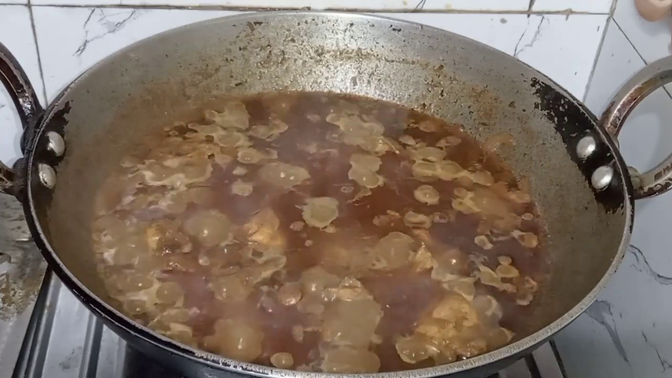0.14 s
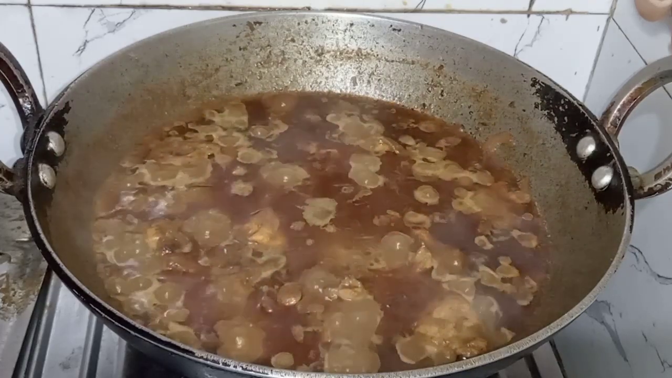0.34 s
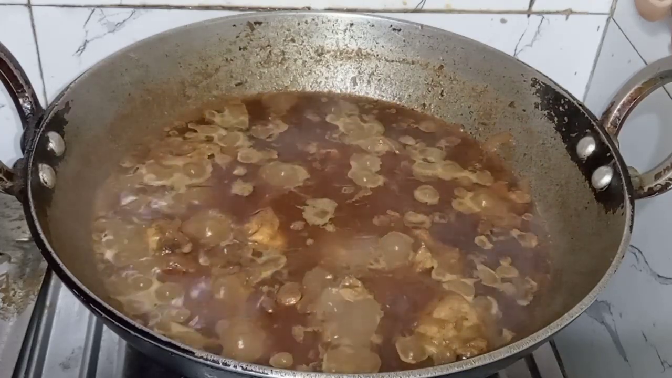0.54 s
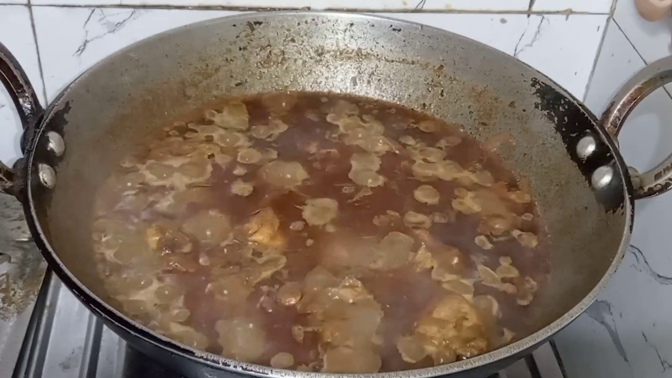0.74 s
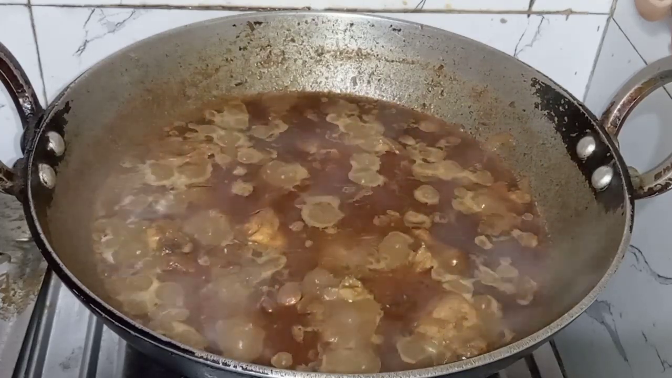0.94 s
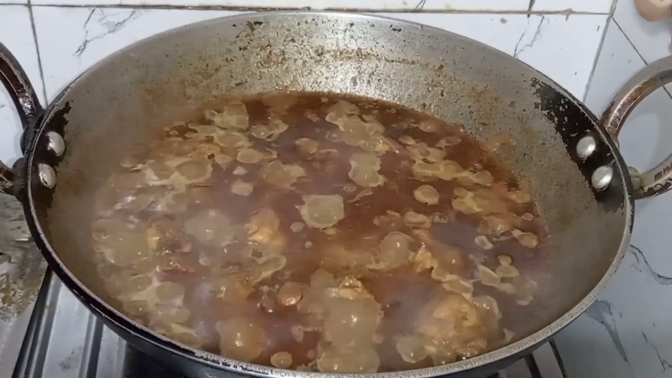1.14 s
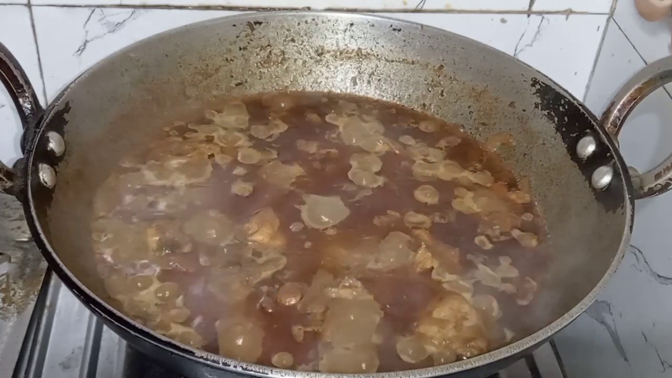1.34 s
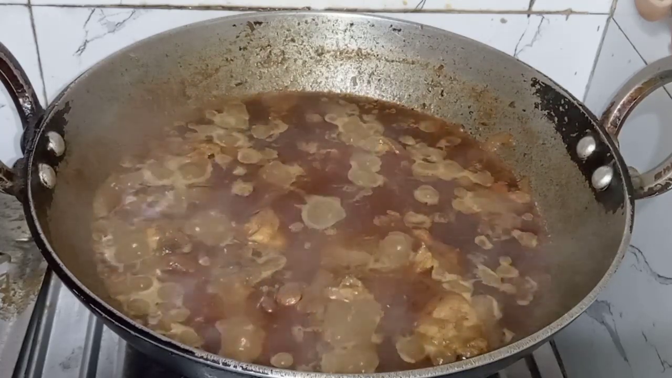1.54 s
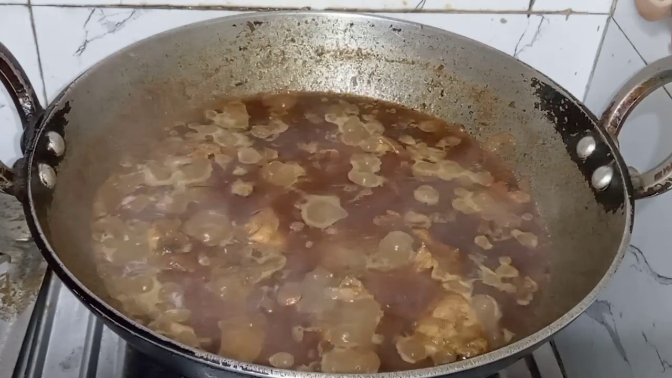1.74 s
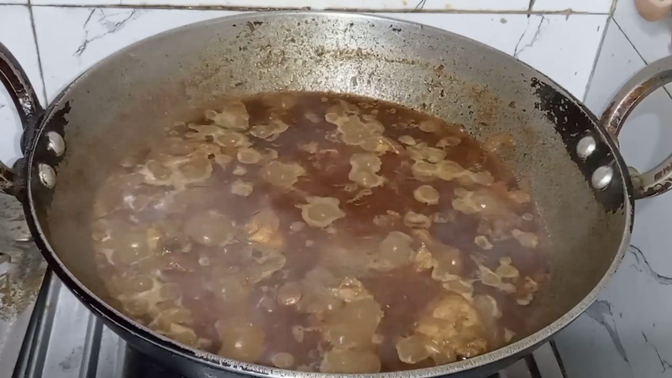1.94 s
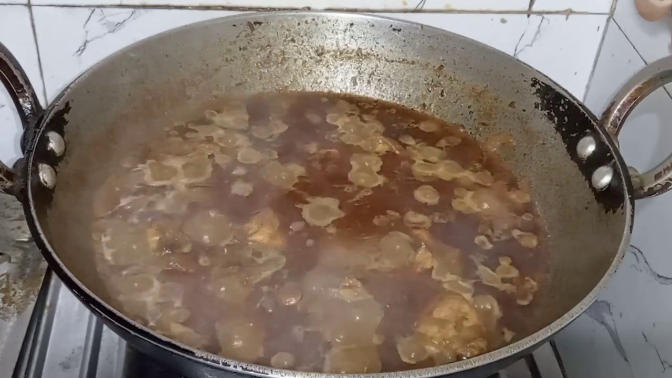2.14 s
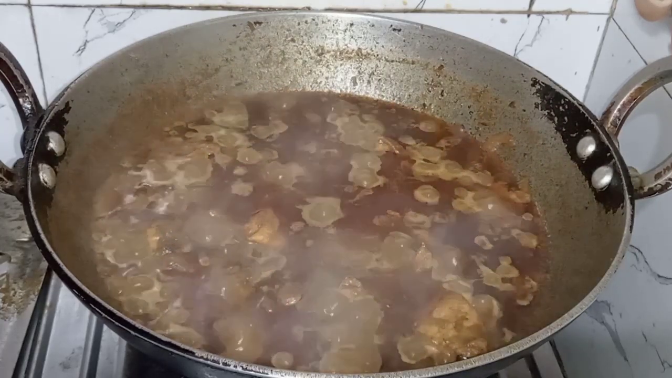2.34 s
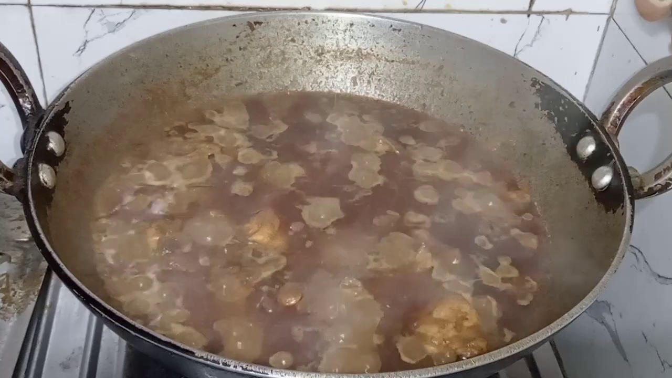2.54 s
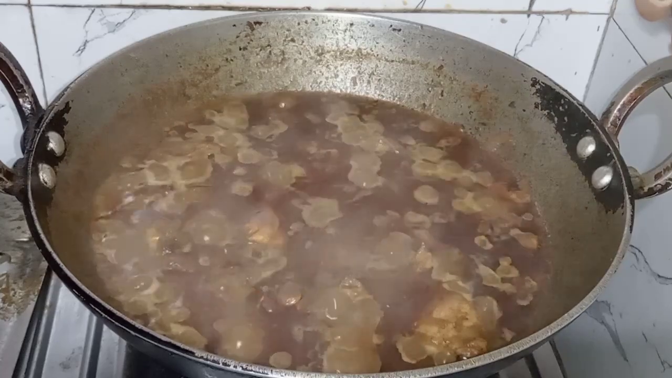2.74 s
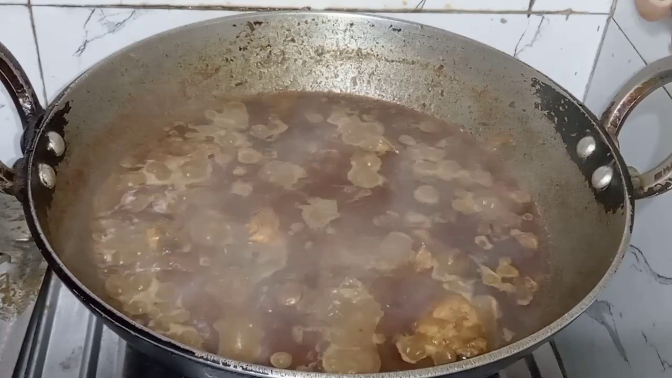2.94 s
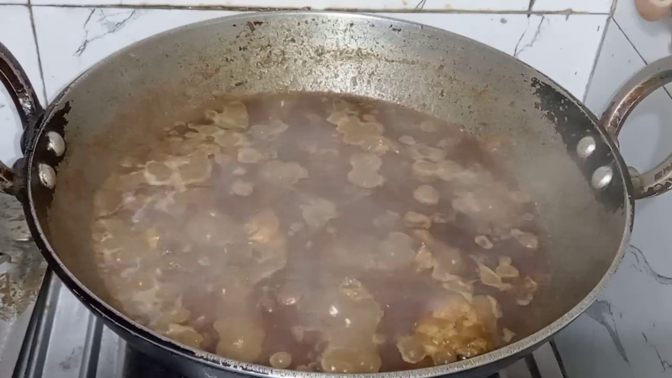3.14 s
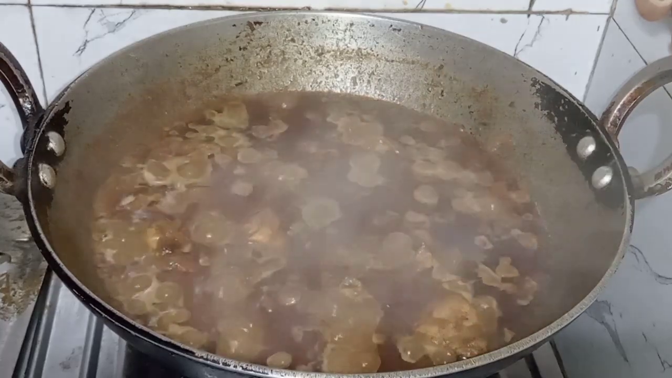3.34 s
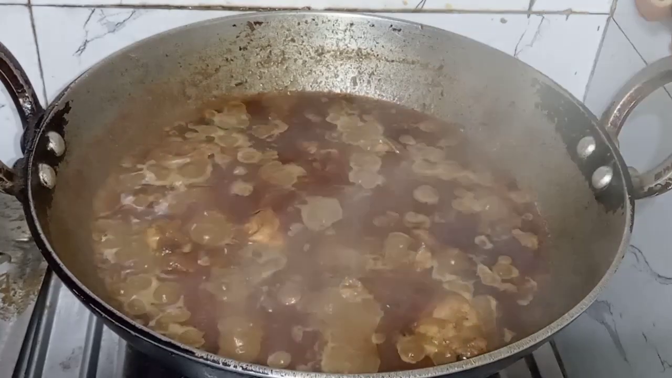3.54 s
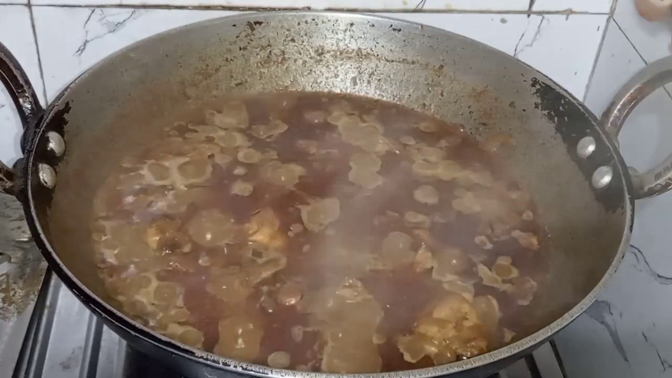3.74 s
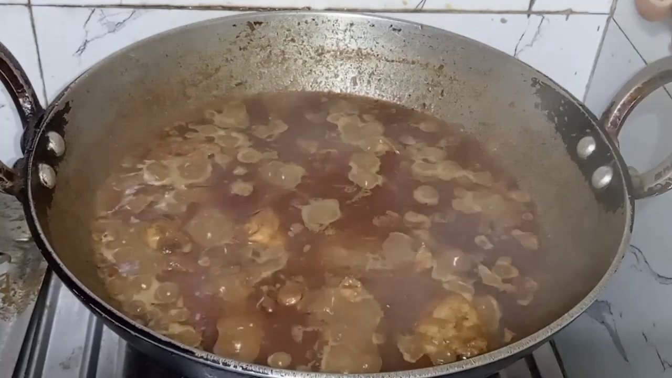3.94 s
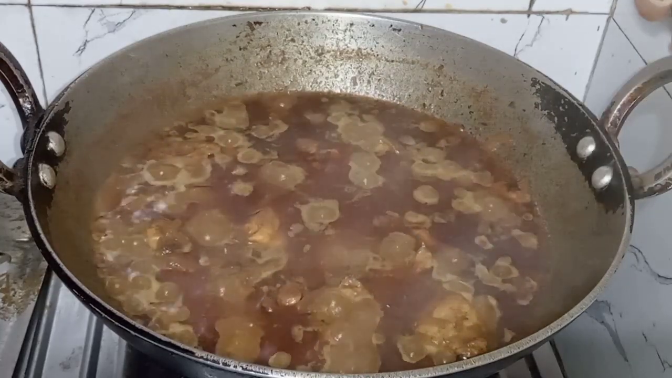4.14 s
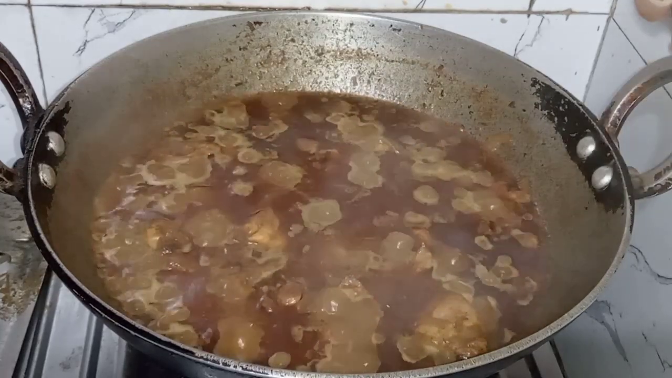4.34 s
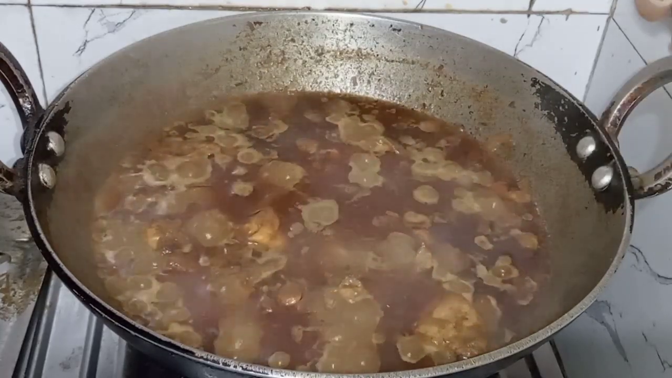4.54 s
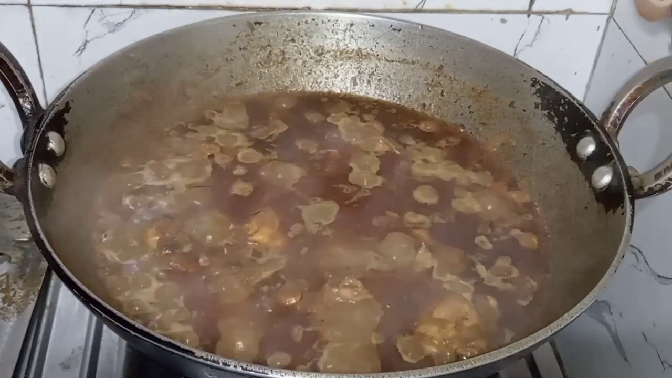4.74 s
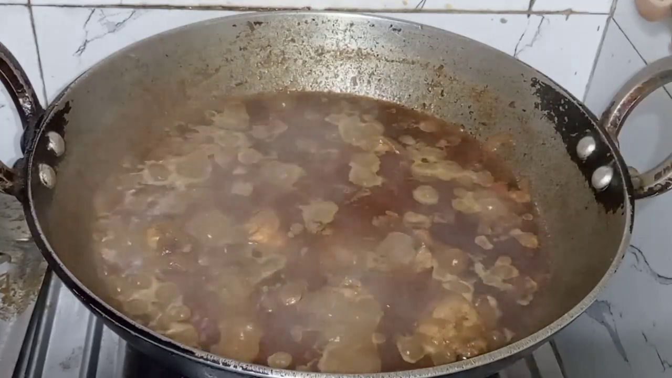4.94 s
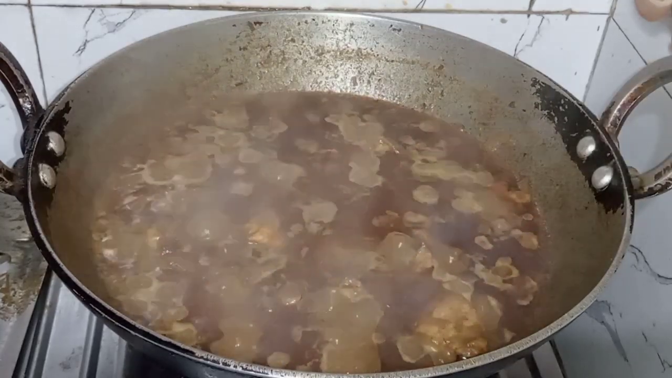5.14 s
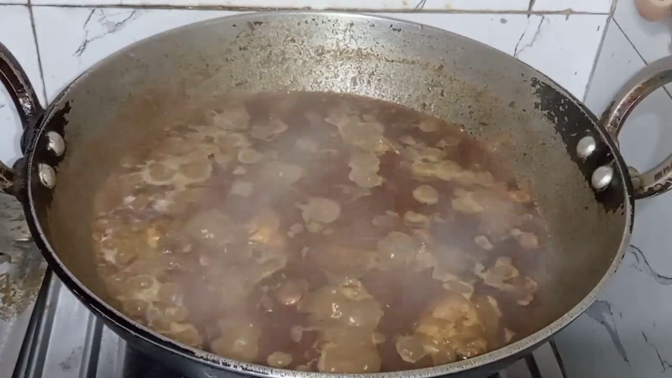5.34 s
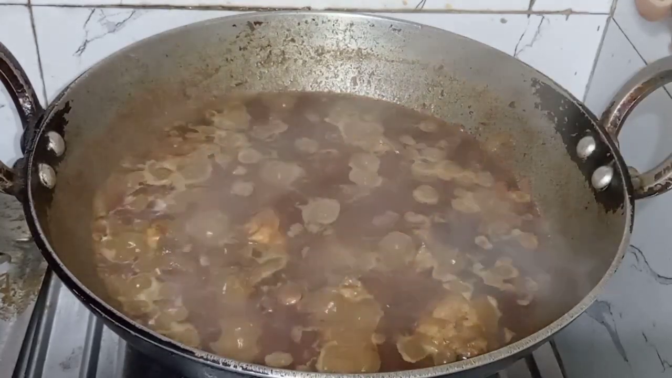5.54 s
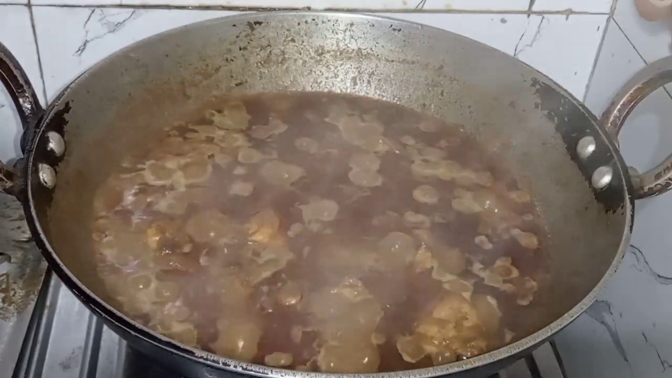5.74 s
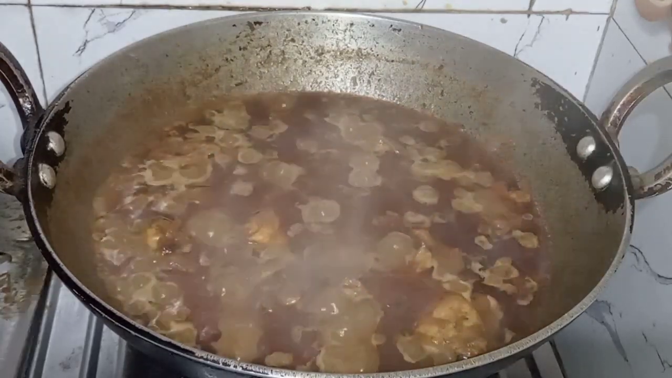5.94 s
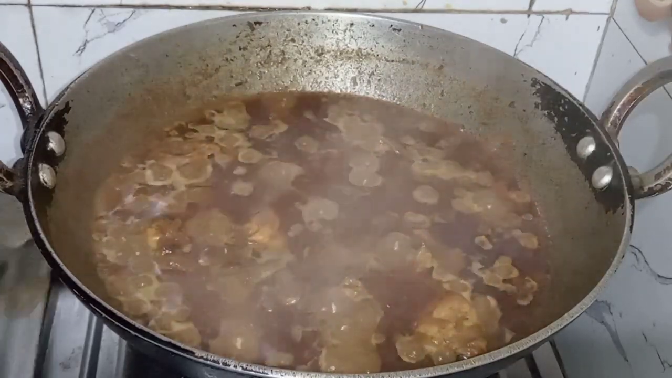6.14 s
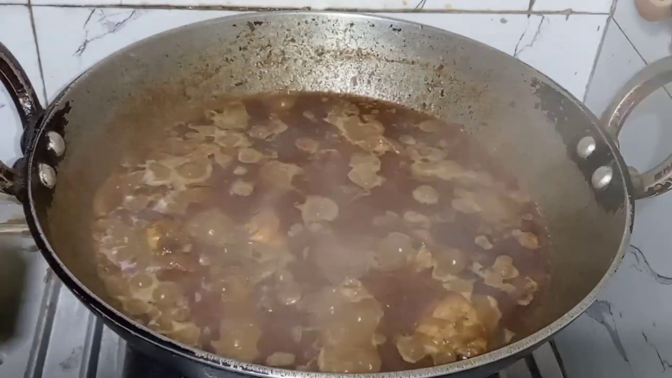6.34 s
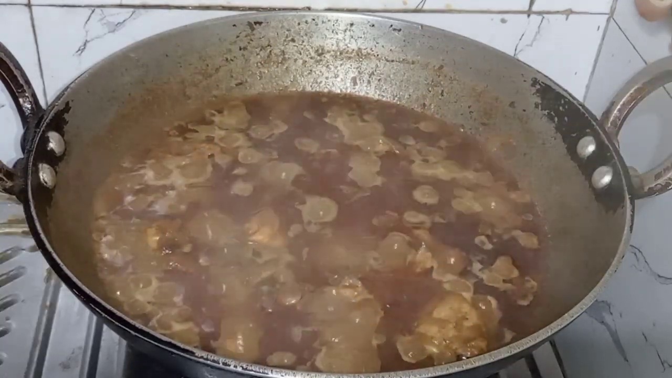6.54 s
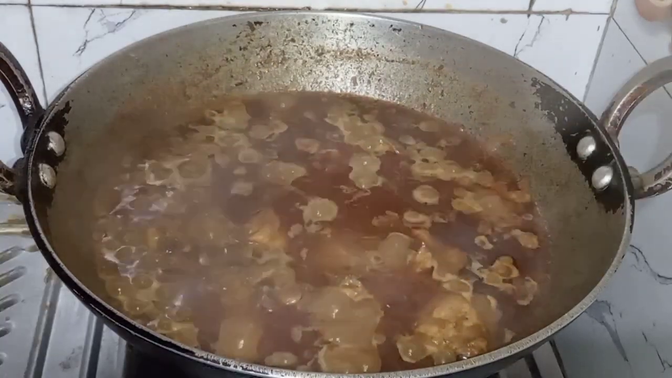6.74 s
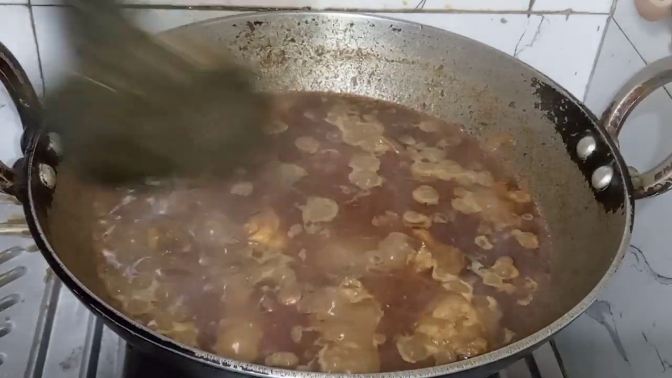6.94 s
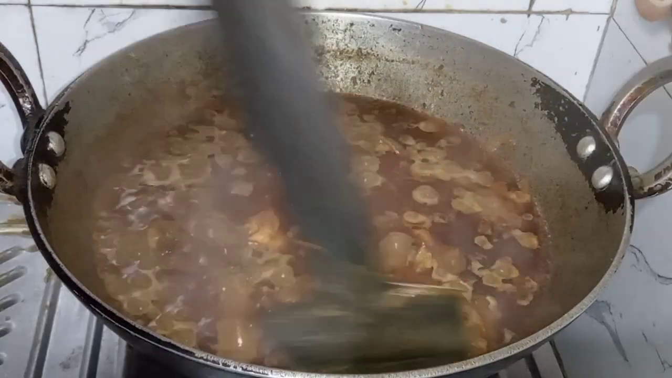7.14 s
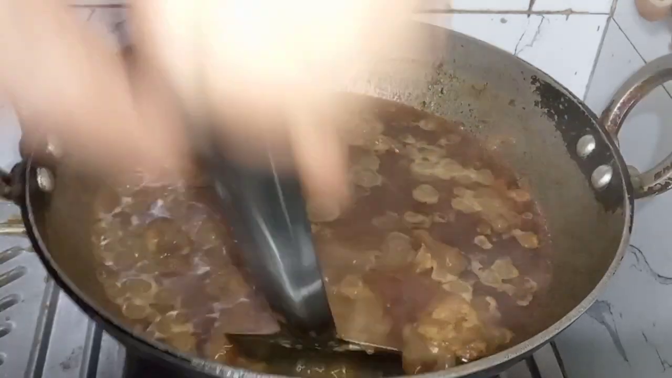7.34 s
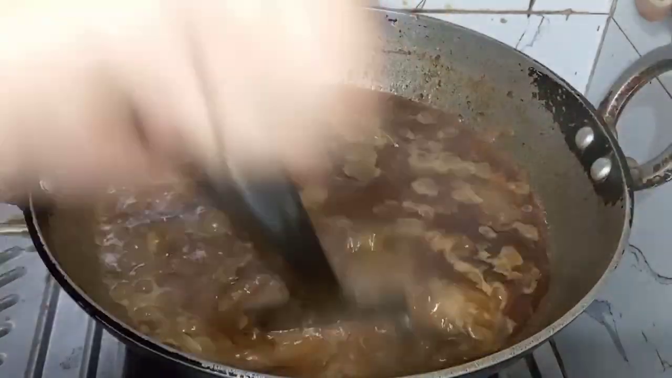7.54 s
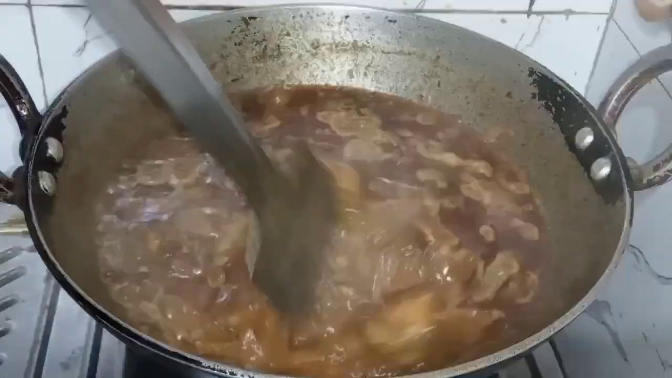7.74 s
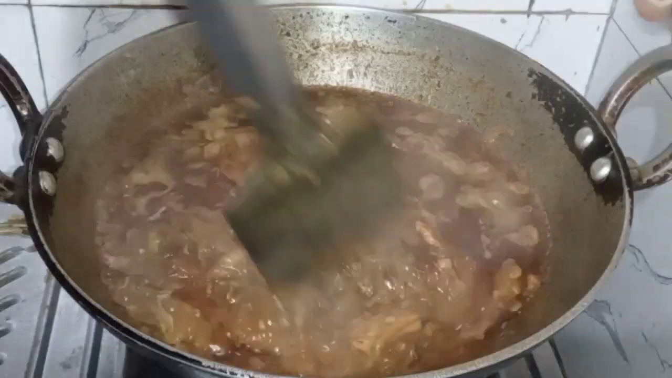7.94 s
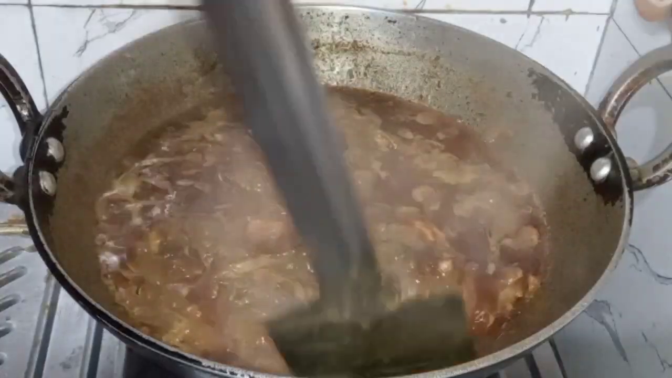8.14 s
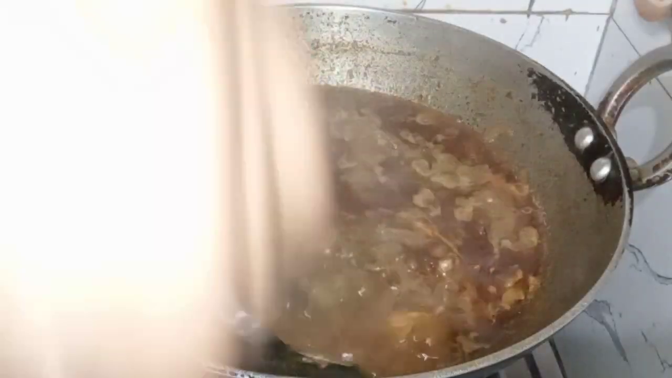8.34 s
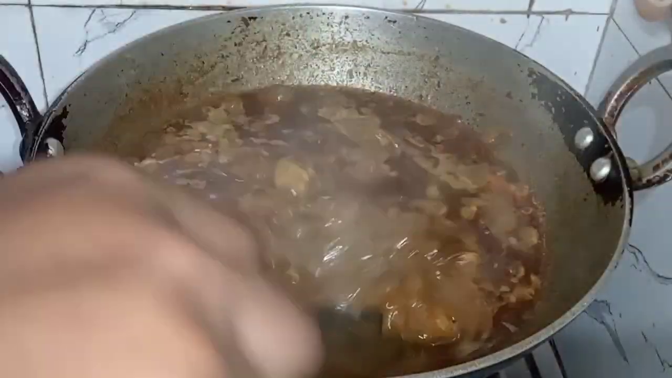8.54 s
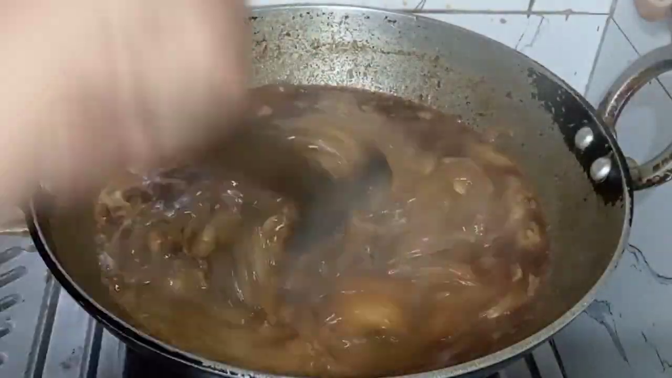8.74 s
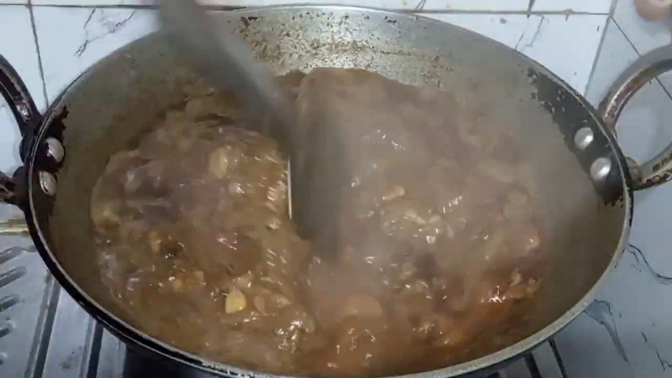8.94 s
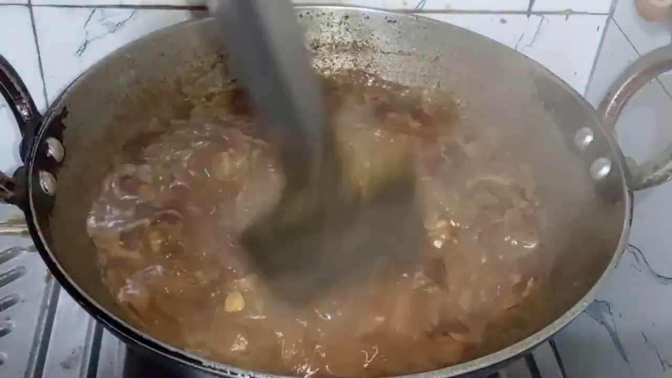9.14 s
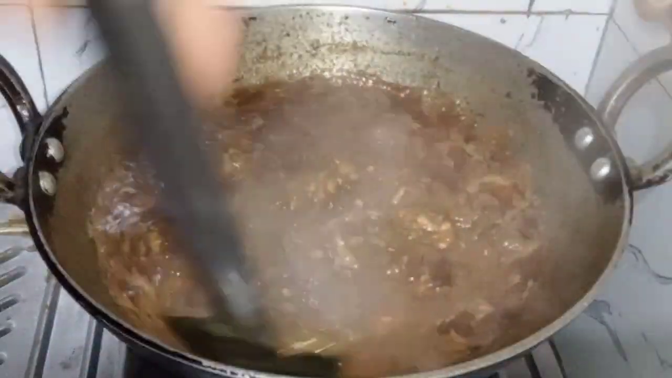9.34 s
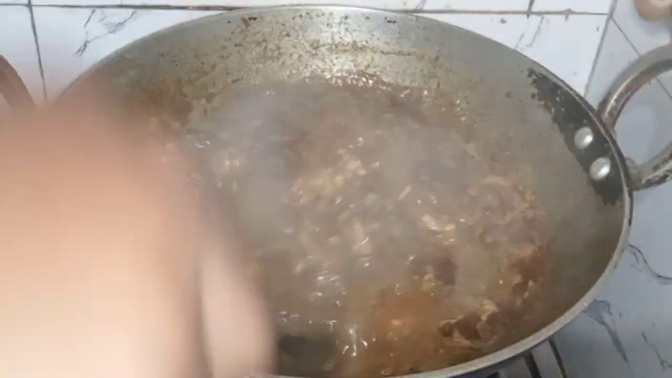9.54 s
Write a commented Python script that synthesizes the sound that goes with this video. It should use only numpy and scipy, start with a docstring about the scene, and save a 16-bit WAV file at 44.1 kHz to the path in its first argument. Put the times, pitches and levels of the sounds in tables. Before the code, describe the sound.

Throughout, gravy simmers quietly in a deep metal pan: overlapping bubble blips, foam crackle and fine high sizzle over a low burner rush with a faint hum. Small wet pops stand out, mostly in the first 1.3 seconds and between 3.3 and 5.7. Around 1.7 seconds kitchenware out of sight lands with a hard clunk, followed at 2.0 by a softer, low thud. At 3.56 a steel dish clatters in rapid blows, rings briefly and rattles to rest by about 3.9. Light taps at 6.1 lead to a sharp knock at 6.22. At 7.16 a metal spatula clinks brightly on the pan, then scrapes it from 7.3 to 7.8, 8.25 to 8.9 and 9.36 to the end. Gravy slops, glugs and gurgles, its pitch falling with each stroke; dull bumps come at 8.1 and 8.4, and another clink at 9.28. Close microphone, lively tiled kitchen, softened extreme treble.

```python
"""Tiled kitchen: curry simmers in a deep metal pan over a burner, with a low rush, fine sizzle and small pops.
Out of sight, kitchenware is put down four times: a clunk, a thud, a clattering steel dish, a knock.
Then a metal spatula clinks into the pan and scrapes along it three times, slopping the gravy about.
Rush, cracks and grating are filtered noise or clicks; bubbles are short pings; struck things ring in modes."""
import sys
import numpy as np
from scipy import signal
from scipy.io import wavfile
from scipy.ndimage import uniform_filter1d

SR = 44100
rng = np.random.default_rng(int(sys.argv[2]) if len(sys.argv) > 2 else 0)


def waveform_to_disk(signal):
    """Save audio, clipped to [-1, 1], as 16-bit WAV at the path in sys.argv[1]."""
    frames = np.transpose(np.atleast_2d(signal))
    scaled = np.clip(frames, -1, 1) * 32767
    samples = np.round(scaled).astype(np.int16)
    wavfile.write(sys.argv[1], SR, samples)


N = 427769
TIME_S = np.arange(N) / SR

# All levels are relative, ahead of later mixing and filtering.
# Reverberation of the kitchen: freq_hz, t60_s
KITCHEN_T60 = [(100, 0.15), (400, 0.82), (1000, 0.57), (3000, 0.41), (8000, 0.27)]
# Air resonances of the bowl of the pan: freq_hz, width_hz, level_db
BOWL_RESONANCES = [(264, 20, 10), (700, 26, 11), (802.5, 25, 17.5), (864, 56, 10), (1078, 33, 14),
                   (1446, 156, 1.5), (1696, 140, 0.5), (2150, 60, 4)]
# Spectrum of the burner rush: freq_hz, density_db_per_hz
RUSH_COLOUR = [(25, -39), (50, -13.5), (64, -26), (78, -0.5), (118, -1.5), (140, -9), (190, -4.5),
               (230, -18), (300, -9.5), (520, -11), (700, -22.5), (1100, -26), (1700, -25), (2300, -26.5),
               (2800, -28.5), (3600, -31), (6500, -23), (8000, -43.5)]
RUSH_DB, HUM_HZ, HUM_DB = -53, 100, -63.5
# Colour of collapsing foam: freq_hz, density_db_per_hz
FOAM_COLOUR = [(900, -19.5), (1500, -1.5), (2200, -2), (2800, -6), (3700, 2), (4500, -8), (5200, -7.5),
               (7000, -21)]
# Depth of the swells and lulls of the simmer: freq_hz, depth_db
PATCH_DEPTH = [(200, 1), (1400, 1.3), (2700, 3.3), (4200, 1.6), (6500, .8)]
# Course of the simmer: time_s, level_db
SIMMER_LEVEL = [(.6, -2), (2.3, -0.5), (3.05, -4), (3.35, -1), (4.4, -2.5), (5.5, -2.5), (6.1, 0),
                (6.8, -2)]
# Bubbles that burst loudest: start_s, level_db, pitch_hz
LOUD_POPS = [(.19, -42, 2200), (.391, -36, 3700), (.826, -38, 4280), (1.068, -36, 1460), (1.069, -42, 3380),
             (1.218, -37, 5040), (3.283, -39, 3700), (3.376, -39, 4900), (3.459, -42, 1710),
             (4.128, -40.5, 1760), (4.352, -34.5, 5850), (4.688, -41, 1550), (4.864, -36, 1690),
             (5.298, -41, 1550), (5.49, -33, 2950), (5.735, -39, 1120)]

# Things put down.
# Blows: start_s, level_db (dish also treble_db: lands flat, then strikes with its rim)
CLUNK_HITS = [(1.692, -28.5), (1.712, -37.5), (1.739, -69)]
THUD_HITS = [(1.999, -37), (2.035, -40)]
DISH_HITS = [(3.563, -27.5, -12), (3.573, -25.5, -9), (3.603, -27, 2), (3.617, -27.5, -4.5),
             (3.641, -33.5, -15.5), (3.664, -41.5, -2.5)]
KNOCK_HITS = [(6.056, -48.5), (6.138, -49.5), (6.2, -51), (6.223, -26.5), (6.23, -33.5)]
# Spectra of the cracks: freq_hz, density_db_per_hz
CLUNK_SPECTRUM = [(70, -26), (200, -5), (320, -2.5), (560, 0), (700, -6), (960, 5), (1100, -20),
                  (1300, -13), (1750, -3.5), (2200, -9), (2600, -4.5), (3000, -26), (5000, -22.5),
                  (8000, -36)]
THUD_SPECTRUM = [(30, -14), (90, 6), (125, 9), (200, 6), (350, -8.5), (490, -1), (620, -4), (880, -1.5),
                 (1500, -13), (2500, -19), (6000, -33)]
DISH_SPECTRUM = [(80, -29), (250, -10), (420, -6.5), (680, -8.5), (1000, 3.5), (1400, -2.5), (1750, -4),
                 (2100, -5.5), (3000, -4), (3600, -11), (4400, -9.5), (4900, -16.5), (5600, -12),
                 (6200, -11.5), (8000, -36)]
KNOCK_SPECTRUM = [(70, -25), (160, -9), (250, -2), (430, 2.5), (630, -7), (800, -3), (950, -0.5),
                  (1200, -13), (1700, -7.5), (3400, -12.5), (4000, -17.5), (4600, -13.5), (6500, -18),
                  (8000, -30)]
# Ringing modes: freq_hz, level_db, t60_s
CLUNK_RING = [(121.8, -14, 1), (327, -4, 0.51), (710, 2, 0.3), (939, 1.5, 0.44)]
THUD_RING = [(119.5, 5, 1.12), (104, -7, 0.8), (185, -6, 0.54), (468, -11.5, 0.61)]
DISH_RING = [(324, -20.5, 0.72), (420, -9.5, 0.34), (537, -12.5, 0.5), (831, -18.5, 0.5), (975, -13, 0.5),
             (1034, -15, 0.7), (1062, -15, 0.8), (1142, -14, 0.85), (1185, -18, 0.7), (1577, -15, 0.26),
             (1820, -16, 0.22), (2412, -2, 0.19), (2433, -2, 0.21), (2600, -17, .3), (2650, -14, .28),
             (2882, -13, 0.28), (3250, -16, .2), (3575, -19, 0.27), (4177, -21, 0.22), (4450, -19, 0.2),
             (5400, -23, .16), (5717, -22, .16), (6035, -24, 0.35)]
KNOCK_RING = [(251, -8.5, 0.4), (431.5, -9.5, 0.3), (833, 1.5, 0.091), (2089, -22, 0.35), (2939, -21, 0.3),
              (3488, -18, 0.26), (4436, -17, 0.3), (5033, -15, .13), (5997, -20, .29), (6492, -23, .25)]
# Dish rocking to rest: first bounce, first gap, gap ratio and loss per bounce
RATTLE_S, RATTLE_DB, RATTLE_GAP_S, RATTLE_GAP_RATIO, RATTLE_LOSS_DB = 3.686, -48.5, 0.066, 0.57, 2.5

# Spatula on the pan, and its dull bumps under the gravy.
# Blows: start_s, level_db (bumps also treble_db)
CLINK_HITS = [(7.163, -25.5), (7.169, -25.5), (7.645, -51), (8.009, -41.5), (8.021, -50), (8.755, -43),
              (8.897, -43.5), (9.277, -31.5)]
BUMP_HITS = [(8.141, -38, 6), (8.157, -40.5, 6), (8.382, -41, 2), (8.402, -43.5, 3)]
# Spectra of the cracks: freq_hz, density_db_per_hz
CLINK_SPECTRUM = [(80, -17), (240, -2.5), (400, -0.5), (900, -5.5), (1100, -3.5), (1400, -1.5), (1800, 5),
                  (2200, -1.5), (2700, 0), (4000, 4), (5200, 10), (6500, 8.5), (7500, 8), (8500, -21.5)]
BUMP_SPECTRUM = [(80, -13), (250, -4), (600, 6), (850, 3.5), (1700, 4), (2500, -2.5), (3300, 0),
                 (4500, -14), (8000, -36)]
# Ringing modes: freq_hz, level_db, t60_s
CLINK_RING = [(1120, -4, 0.073), (2640, -1, 0.056), (4920, 3.5, 0.052), (5350, -29, .25), (5300, -25, .25),
              (6560, -36, 0.2)]
BUMP_RING = [(266, -8, 0.34), (775, -7, 0.15), (1080, -1.5, .1)]

# Slops of gravy: start_s, swell_s, level_db, pitch_hz
GRAVY_SLOPS = [(7.386, 0.0096, -42.5, 2700), (7.455, 0.027, -37.5, 274), (7.728, 0.0081, -42.5, 3580),
               (7.789, 0.011, -41, 3360), (7.872, 0.0076, -41, 3200), (7.912, 0.005, -42, 3500),
               (8.01, 0.0086, -40.5, 1530), (8.07, 0.0086, -49, 1200), (8.209, 0.0037, -46, 3000),
               (8.265, 0.0072, -40, 1880), (8.356, 0.0076, -43, 404), (8.381, 0.01, -34.5, 1530),
               (8.506, 0.018, -41, 1700), (8.598, 0.013, -35.5, 1740), (8.79, 0.0084, -39.5, 1000),
               (8.882, 0.006, -42, 3630), (8.926, 0.008, -40, 2100), (9.057, 0.0072, -40.5, 3030),
               (9.101, 0.0055, -51, 4000), (9.174, 0.0093, -39.5, 2290), (9.222, 0.005, -36, 1700),
               (9.28, 0.0098, -37, 270), (9.297, 0.01, -34.5, 1040), (9.451, 0.0062, -39, 3300),
               (9.497, 0.0086, -38.5, 1500), (9.624, 0.0075, -38.5, 295)]
DROPLETS_PER_S = 2500
# Strokes of the spatula: start_s, length_s, scrape_db
SPATULA_STROKES = [(7.3, 0.47, -37), (8.253, 0.66, -37), (9.358, 0.95, -35.5)]
STIR_START_S = SPATULA_STROKES[0][0]
GRATE_PEAK_SHARE = 0.39  # share of a stroke at which the blade grates hardest
DRAG_DB = -54  # the blade barely drags between strokes
# Colour of the grating blade: freq_hz, density_db_per_hz
SCRAPE_COLOUR = [(40, -16), (70, -14), (115, 9), (170, -12), (260, 6), (380, -5), (650, 2.5), (1400, 3.5),
                 (1900, 3), (2450, 1), (3700, 5.5), (5000, 0), (6300, 4.5), (7400, 2.5), (8500, -25)]
# Resonances of the blade dragged on steel: freq_hz, width_hz, level_db
BLADE_RESONANCES = [(1810, 47, 4), (2780, 25, -2), (4000, 120, -12.5)]
# Gurgle, mostly falling along a stroke as the blade traps larger air pockets:
# time_s, pitch_hz, gurgle_db, glug_db
GURGLE_COURSE = [(7.29, 2170, -64, -36.5), (7.34, 1840, -51.5, -60), (7.47, 1810, -46.5, -51),
                 (7.58, 1480, -45, -60), (7.7, 1080, -45, -59), (7.8, 933, -49, -55),
                 (7.86, 890, -49.5, -67), (8.24, 2190, -85, -50.5), (8.32, 2100, -47.5, -51),
                 (8.45, 1670, -47, -65), (8.56, 1450, -42, -66), (8.66, 925, -44.5, -72),
                 (8.781, 850, -45.5, -63), (8.87, 803, -59, -59), (9.02, 850, -53, -54),
                 (9.13, 866, -57.5, -53), (9.37, 2320, -62, -48), (9.42, 2070, -55, -50.5),
                 (9.5, 1550, -47, -55.5), (9.6, 1130, -48.5, -51), (9.69, 1030, -46, -50)]


def gain_of(db):
    """Decibels to gain."""
    return 10 ** (np.asarray(db) / 20)


def evened(x):
    """Scales to rms 1."""
    return x / np.sqrt(np.mean(x ** 2) + 1e-20)


def read(points, hz):
    """Reads a table on a log-frequency axis."""
    table_hz, value = np.transpose(points)
    return np.interp(np.log(hz + 1), np.log(table_hz + 1), value)


def add(mix, start_s, sound):
    """Mixes a sound in at start_s."""
    part = mix[max(round(start_s * SR), 0):][:len(sound)]
    part += sound[:len(part)]


def drift(per_s):
    """Slow random curve of rms 1, with per_s knots a second."""
    knots_s = np.arange(0, 11, 1 / per_s)
    return evened(np.interp(TIME_S, knots_s, rng.standard_normal(4096)[:len(knots_s)]))


def coloured(x, spectrum, size=4096):
    """Minimum-phase filter with the given spectrum; keeps the power of white noise."""
    log_gain = np.log(gain_of(read(spectrum, abs(np.fft.fftfreq(size, 1 / SR)))))
    response = np.exp(np.conj(signal.hilbert(log_gain)))
    taps = np.fft.ifft(response).real[:size // 2]
    return signal.oaconvolve(x, taps / np.linalg.norm(taps))[:len(x)]


def resonate(x, hz, width_hz):
    """Fixed or moving resonance of gain 1: shifts to 0 Hz, smooths, shifts back."""
    turn = np.exp(2j * np.pi * np.cumsum(hz * np.ones(len(x))) / SR)
    r = np.exp(-np.pi * width_hz / SR)
    return 2 * (turn * signal.lfilter([1 - r], [1, -r], x / turn + 1e-18)).real


def rung(x, resonances):
    """A sound together with the resonances that it excites."""
    return x + sum(gain_of(db) * resonate(x, hz, width_hz) for hz, width_hz, db in resonances)


def bowl(x):
    """The hollow of the pan lends its air resonances to whatever sounds inside."""
    return rung(x, BOWL_RESONANCES)


def echoes(near_t60_s, wet_db):
    """Impulse response: direct sound, a flurry off near surfaces, then the kitchen's tail."""
    t = TIME_S[:SR * 3 // 4]
    near, far = rng.choice([-1., 1.], (2, len(t)))
    near = near * gain_of(-60 * t / near_t60_s)
    near[0] = 6  # direct sound
    hz, at_s, bands = signal.stft(far, SR, nperseg=256)
    bands = bands * gain_of(-60 * at_s / read(KITCHEN_T60, hz)[:, None])
    far = signal.istft(bands, SR, nperseg=256)[1][:len(t)]
    far = far * np.minimum(t / 0.0013, 1)
    return near / np.linalg.norm(near) + gain_of(wet_db) * far / np.linalg.norm(far)


def reverberated(x, near_t60_s, wet_db):
    """A whole layer with its echoes."""
    return signal.oaconvolve(x, echoes(near_t60_s, wet_db))[:N]


def swarm(count, spread_db):
    """Draws bubbles: place 0-1, offset from the usual pitch, level in dB (a few are large)."""
    place, pitch, chance = rng.random((count, 3)).T
    offset = np.log((pitch + .02) / (1.02 - pitch)) / 2
    return place, offset, -spread_db * np.log(chance + .03)


def pings(start_s, hz, db, cycles, rise, size):
    """Each bubble rings for a few cycles, its pitch rising as it reaches the surface."""
    t, hz = TIME_S[:size], hz[:, None]
    age = t * hz / cycles
    tone = np.sin(2 * np.pi * hz * t * (1 + rise * np.minimum(age, 10)))
    wave = gain_of(db)[:, None] * age * np.exp(-age) * tone
    at = (start_s * SR).astype(int)[:, None] + np.arange(size)
    return np.bincount(at.ravel(), wave.ravel(), N + size)[:N]


def scattered(start_s, hz, db, cycles, rise, size, near_t60_s, wet_db, count=10):
    """Bubbles lie in count spots of the pan, and each spot echoes in its own way."""
    out = 0
    for k in range(count):
        spot = pings(start_s[k::count], hz[k::count], db[k::count], cycles, rise, size)
        out = out + signal.oaconvolve(spot, echoes(near_t60_s, wet_db)[:SR // 4])[:N]
    return out


def rush():
    """Burner's low rush under the pan: coloured noise, over a faint mains hum."""
    noise = evened(bowl(coloured(rng.standard_normal(N), RUSH_COLOUR)))
    noise = noise * gain_of(0.6 * drift(per_s=15))
    hum = np.sin(2 * np.pi * HUM_HZ * TIME_S) * gain_of(HUM_DB + 2 * drift(per_s=3.9))
    return gain_of(RUSH_DB) * noise + hum


def bubbling(centre_hz=1350, octaves=0.449, level_db=-59.0):
    """Bubbles of many sizes blip and overlap all over the surface of the gravy."""
    place, pitch, db = swarm(count=3800, spread_db=3.9)
    hz = centre_hz * 2 ** (octaves * pitch)
    blips = pings(place * N / SR, hz, db - 1.2 * pitch ** 2, cycles=2.4, rise=.012, size=1200)
    blips = blips * gain_of(1.5 * drift(per_s=30))
    blips = evened(reverberated(bowl(blips), near_t60_s=0.00039, wet_db=-9.0))
    return gain_of(level_db + 0.47 * drift(per_s=4.1)) * blips


def foam(level_db=-65.5, low_hz=1400, high_hz=4800, cluster_s=.022, count=5):
    """Foam collapses in surges: a few like-sized bubbles go at once, with quiet gaps between."""
    place, _, db = swarm(count=1200, spread_db=2.3)
    size = np.repeat(rng.random(len(db)), count)
    delay, detune = rng.random((len(size), 2)).T
    hz = low_hz * (high_hz / low_hz) ** (size + 0.2 * (detune - .5))
    start_s = np.repeat(place, count) * N / SR + cluster_s * delay ** 2
    snaps = scattered(start_s, hz, np.repeat(db, count) - 8 * delay, cycles=2.2, rise=.006,
                      size=500, near_t60_s=.004, wet_db=-13, count=4)
    surges = gain_of(5 * np.tanh(drift(per_s=10)))
    return gain_of(level_db) * evened(coloured(snaps, FOAM_COLOUR) * surges)


def sizzle(level_db=-60.0, low_hz=2900, usual_hz=6300, high_hz=7680):
    """Tiny bubbles snap at the hot rim, each a ping of a few cycles; larger, lower ones are rare."""
    place, _, db = swarm(count=7000, spread_db=3.8)
    hz = rng.triangular(low_hz, usual_hz, high_hz, len(db))
    snaps = scattered(place * N / SR, hz, db + 4 * np.log2(hz / usual_hz), cycles=1.7, rise=.006,
                      size=200, near_t60_s=.016, wet_db=-12)
    snaps = evened(snaps * gain_of(1.5 * drift(per_s=23)))
    return gain_of(level_db + .5 * drift(per_s=1.0)) * snaps


def patchy(x, size=12):
    """Bubbles of each size come and go: bands some 500 Hz wide swell and sink over about 0.1 s."""
    hz, _, bands = signal.stft(x, SR, nperseg=1024, noverlap=512)
    field = uniform_filter1d(rng.standard_normal(bands.shape), size, axis=0)
    field = evened(uniform_filter1d(field, size - 4, axis=1))
    # lulls go deeper than swells rise
    change_db = np.minimum(field, 1) * read(PATCH_DEPTH, hz)[:, None]
    return signal.istft(bands * gain_of(change_db), nperseg=1024, noverlap=512)[1][:N]


def pops(length_s=.0055, breadth=.28):
    """Films of gravy tear: short spits of noise around the pocket's pitch; big pockets last longer."""
    t, out = TIME_S[:SR // 6], np.zeros(N)
    for start_s, db, hz in LOUD_POPS:
        spit = resonate(rng.standard_normal(len(t)), hz, hz * breadth)
        spit = evened(resonate(spit, hz, hz * breadth))
        rise = 1 - np.exp(-6 * t / length_s)
        decay = np.exp(-t / length_s * np.sqrt(hz / 2000))
        add(out, start_s, .5 * gain_of(db) * spit * rise * decay)
    return reverberated(out, near_t60_s=0.013, wet_db=-10)


def simmer():
    """Rush, bubbles and foam follow the simmer's course; sizzle and pops lie on top."""
    course = gain_of(np.interp(TIME_S, *np.transpose(SIMMER_LEVEL)))
    return patchy((rush() + bubbling() + foam()) * course + sizzle()) + pops()


def crack(colour, near_t60_s, wet_db, db, treble_db=0):
    """One blow and its echoes; a harder contact has more treble, from 4.5 kHz up."""
    colour = [(hz, level_db + treble_db * np.clip(hz / 1500 - 3, 0, 1)) for hz, level_db in colour]
    return gain_of(db) * coloured(echoes(near_t60_s, wet_db), colour) * np.sqrt(SR / 100)


def struck(blows, colour, modes, near_t60_s, wet_db, ring_db):
    """Each blow gives a coloured crack that echoes, and feeds energy to the thing's ringing modes."""
    t, out, ring = TIME_S[:SR], np.zeros(N), np.zeros(N)
    for start_s, *strength in blows:
        add(out, start_s, crack(colour, near_t60_s, wet_db, *strength))
    for hz, level_db, t60_s in modes:
        energy = np.zeros(N)
        build_up = np.minimum(t * hz / 3, 1)  # over three cycles
        decay = gain_of(level_db - 60 * t / t60_s) * build_up
        for start_s, db, *_ in blows:
            add(energy, start_s, (gain_of(db) * decay) ** 2)
        live = np.flatnonzero(energy)
        flutter = 0.49 * drift(per_s=np.sqrt(hz))[live]  # reflections make the ring waver
        phase = 2 * np.pi * hz * TIME_S[live]
        ring[live] += np.sqrt(energy[live]) * (np.sin(phase) + flutter * np.cos(phase))
    return out + gain_of(ring_db) * ring


def rattle(count=6):
    """Bounces (start_s, level_db) of a dish that rocks to rest, ever closer and weaker."""
    k = np.arange(count)
    gaps_s = RATTLE_GAP_S * RATTLE_GAP_RATIO ** k
    return list(zip(RATTLE_S + np.cumsum(gaps_s) - gaps_s, RATTLE_DB - RATTLE_LOSS_DB * k))


def kitchenware():
    """Things put down across the kitchen: struck modes, heard mostly through the room."""
    clunk = struck(CLUNK_HITS, CLUNK_SPECTRUM, CLUNK_RING, near_t60_s=0.15, wet_db=-6.5, ring_db=-6.0)
    thud = struck(THUD_HITS, THUD_SPECTRUM, THUD_RING, near_t60_s=0.2, wet_db=-6.0, ring_db=-4.0)
    dish_hits = list(DISH_HITS) + rattle()
    dish = struck(dish_hits, DISH_SPECTRUM, DISH_RING, near_t60_s=0.23, wet_db=-1, ring_db=-0.5)
    knock = struck(KNOCK_HITS, KNOCK_SPECTRUM, KNOCK_RING, near_t60_s=0.23, wet_db=-7.5, ring_db=0.0)
    return clunk + thud + dish + knock


def gravy():
    """Gurgle pitch (Hz), gurgle level (dB) and glug level (dB), sample by sample."""
    time_s, *columns = np.transpose(GURGLE_COURSE)
    return [np.interp(TIME_S, time_s, column) for column in columns]


def sloshing(centre_hz=235, octaves=0.69):
    """Once stirred, the body of the gravy rocks in the pan with low, soft glugs."""
    place, pitch, db = swarm(count=420, spread_db=3.4)
    start_s = STIR_START_S + place * (N / SR - STIR_START_S)
    hz = centre_hz * 2 ** (octaves * pitch)
    glugs = pings(start_s, hz, db, cycles=1.0, rise=0.0071, size=2400)
    _, _, glug_db = gravy()
    return gain_of(glug_db) * glugs / np.std(glugs[TIME_S > STIR_START_S])


def slops(deep_db=-30, body_db=-2, top_db=-19, lumpy_db=1.5):
    """Gravy slaps off the blade: a broad, lumpy spatter that swells and is soon gone."""
    t, out = TIME_S[:SR // 5], np.zeros(N)
    for start_s, swell_s, db, hz in GRAVY_SLOPS:
        colour = [(hz / 6, deep_db), (hz / 2, body_db), (hz, 0), (hz * 3, top_db)]
        droplets = rng.standard_normal(len(t)) * (rng.random(len(t)) < DROPLETS_PER_S / SR)
        spatter = evened(bowl(coloured(droplets, colour)))
        add(out, start_s, gain_of(db) * spatter * t / swell_s * np.exp(1 - t / swell_s))
    lumps = gain_of(lumpy_db * drift(per_s=370) - 1.5)
    return reverberated(out * lumps, near_t60_s=0.006, wet_db=-9.0)


def spatula_blows():
    """The spatula clinks on the pan, and bumps it dully under the gravy."""
    clinks = struck(CLINK_HITS, CLINK_SPECTRUM, CLINK_RING, near_t60_s=0.055, wet_db=-2.5, ring_db=-5.0)
    bumps = struck(BUMP_HITS, BUMP_SPECTRUM, BUMP_RING, near_t60_s=0.097, wet_db=-9.5, ring_db=0.5)
    return clinks + bumps


def clicks(per_s, spread_db):
    """Random clicks of either sign, most small and a few large."""
    size = gain_of(spread_db * np.minimum(rng.exponential(1, N), 4))
    return size * rng.choice([-1, 1], N) * (rng.random(N) < per_s / SR)


def arch(share, peak, sharpness):
    """Rises from nothing to 1 at the peak of a stroke and dies away by its end."""
    return np.sin(np.pi / 2 * np.interp(share, [0, peak, 1], [0, 1, 0])) ** sharpness


def strokes():
    """Level of the grating (dB): every stroke follows the same course."""
    grate = np.zeros(N)
    for start_s, length_s, db in SPATULA_STROKES:
        grate += gain_of(db) * arch((TIME_S - start_s) / length_s, GRATE_PEAK_SHARE, sharpness=0.71)
    return 20 * np.log10(np.hypot(grate, gain_of(DRAG_DB)))


def grating(scrape_db=-6, hollow_db=-14):
    """The blade grates over the pan: dense clicks ring the blade and, faintly, the pan's hollow."""
    grit = rung(coloured(clicks(3200, spread_db=3.0), SCRAPE_COLOUR), BLADE_RESONANCES)
    grit = evened(grit + gain_of(hollow_db) * bowl(grit))
    waver_db = 0.46 * drift(per_s=69) + 0.87 * drift(per_s=14)
    return grit * gain_of(scrape_db + strokes() + waver_db)


def gurgling(pocket_db=-10, pocket_width_hz=170):
    """Pushed gravy froths in pings; the air pocket behind the blade sings as resonant noise."""
    gurgle_hz, gurgle_db, _ = gravy()
    place, pitch, db = swarm(count=3000, spread_db=3.2)
    start_s = STIR_START_S + place * (N / SR - STIR_START_S)
    hz = np.interp(start_s, TIME_S, gurgle_hz) * 2 ** (.42 * pitch)
    froth = bowl(pings(start_s, hz, db + 5 * np.log2(hz / 1000), cycles=1.2, rise=0.006, size=600))
    # level the froth over time, so that gurgle_db sets its course
    froth = froth / np.sqrt(abs(uniform_filter1d(froth ** 2, size=4000)) + 1e-3)
    pocket = resonate(rng.standard_normal(N), gurgle_hz, pocket_width_hz)
    pocket = evened(resonate(pocket, gurgle_hz, pocket_width_hz))
    gurgle = 0.9 * froth + gain_of(pocket_db) * pocket * gurgle_hz / 1200
    return gurgle * gain_of(gurgle_db + 0.62 * drift(per_s=37))


def stirring():
    """Grating and gurgling, faded in just before the first stroke, with their echoes."""
    in_pan = np.clip((TIME_S - STIR_START_S) / 0.088 + 1, 0, 1)
    return reverberated(in_pan * (grating() + gurgling()), near_t60_s=0.0005, wet_db=-7)


def scene():
    """Simmer, kitchenware and spatula at one microphone."""
    return (simmer() + kitchenware() + sloshing() + slops() + spatula_blows() + stirring())[None]


def record(dry, bass_hz=48, treble_hz=7550, edge_hz=8400):
    """Small microphone: little deep bass, treble rolled off up to the band limit."""
    thin = signal.sosfilt(signal.butter(2, bass_hz, "highpass", fs=SR, output="sos"), dry)
    soft = signal.sosfilt(signal.butter(8, treble_hz, fs=SR, output="sos"), thin)
    band_limit = signal.firwin(255, edge_hz, window=("kaiser", 8), fs=SR)
    return signal.oaconvolve(soft, band_limit[None], "same")


dry = scene()
out = record(dry)
waveform_to_disk(out)
```